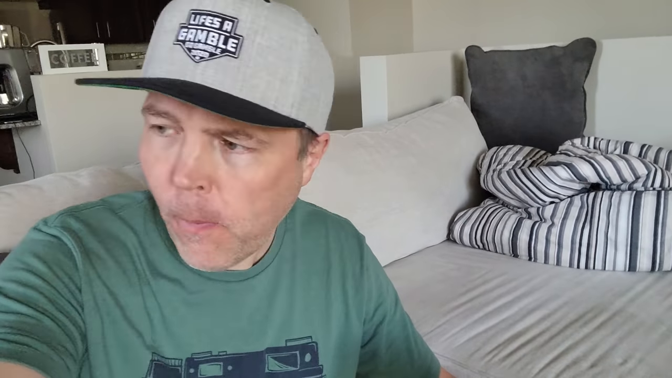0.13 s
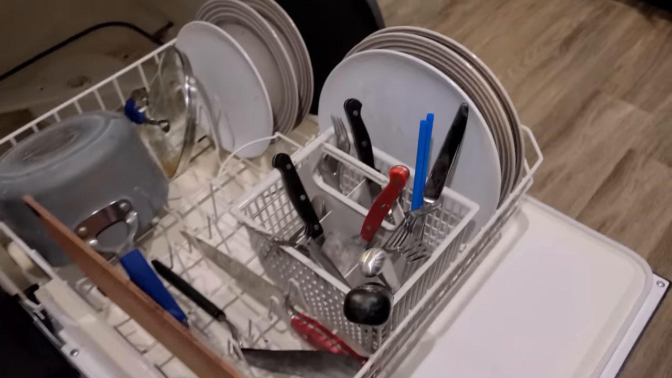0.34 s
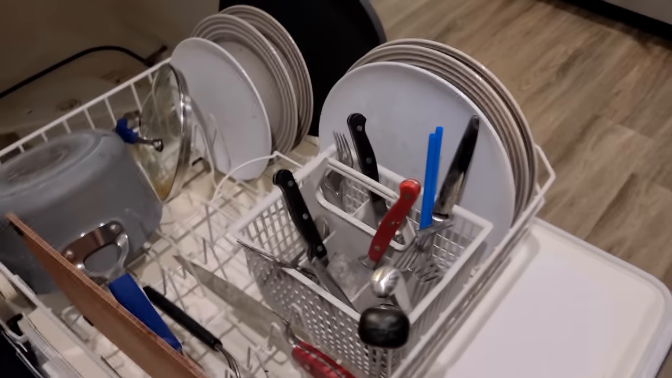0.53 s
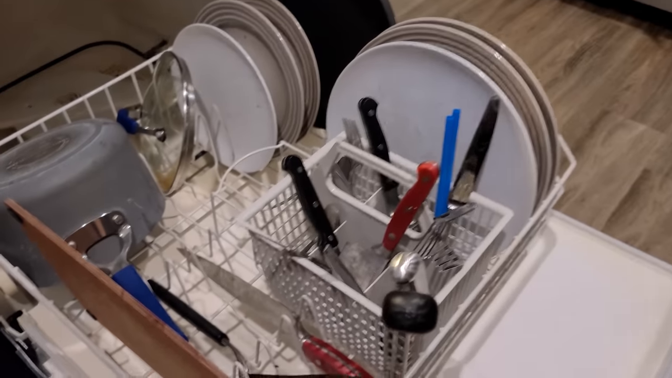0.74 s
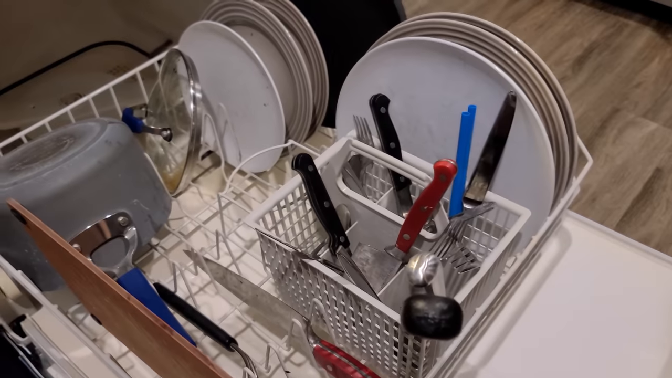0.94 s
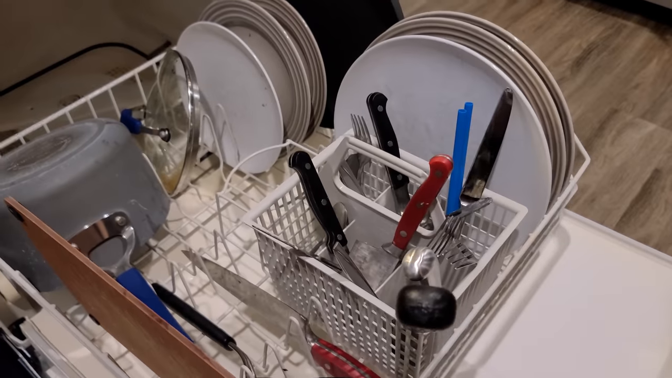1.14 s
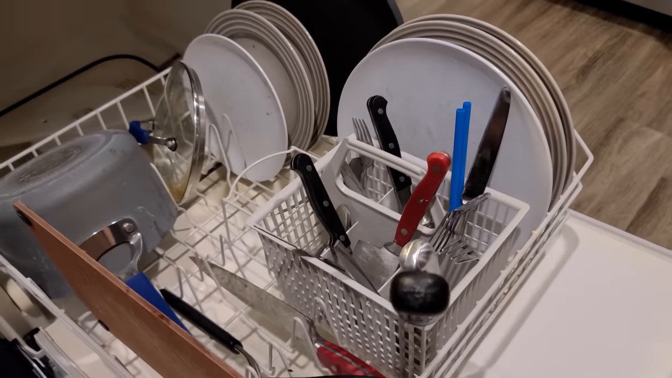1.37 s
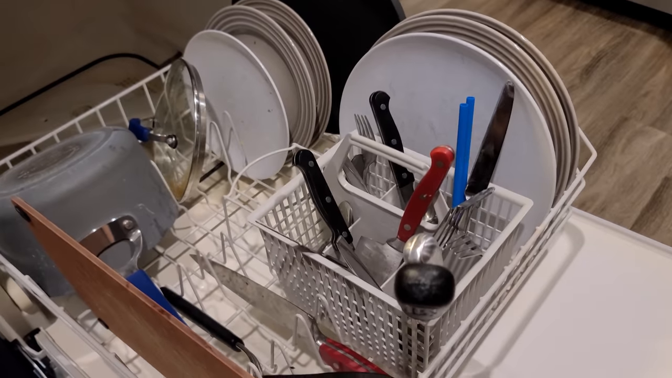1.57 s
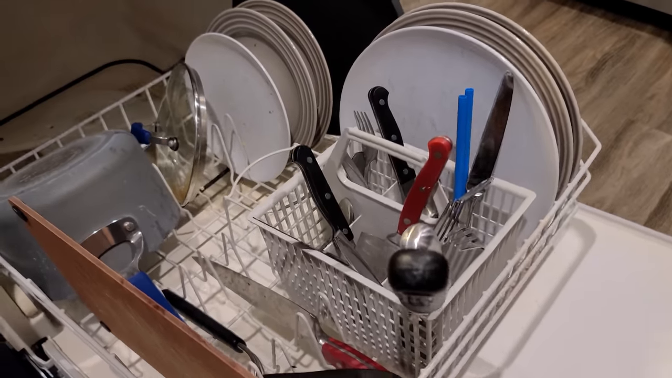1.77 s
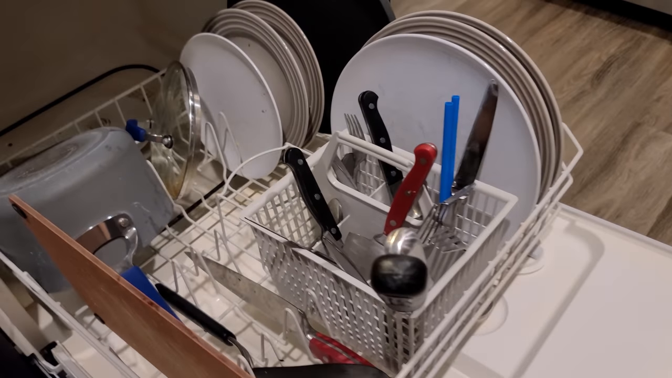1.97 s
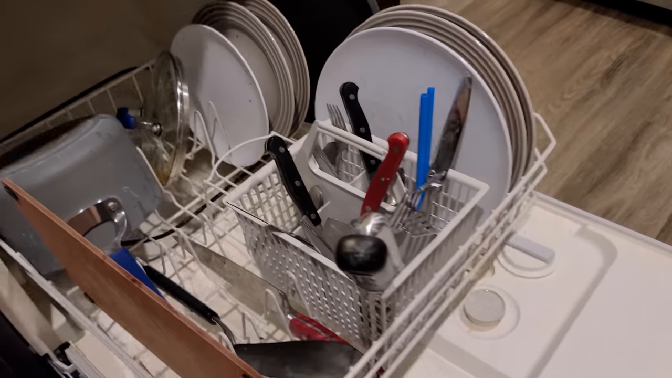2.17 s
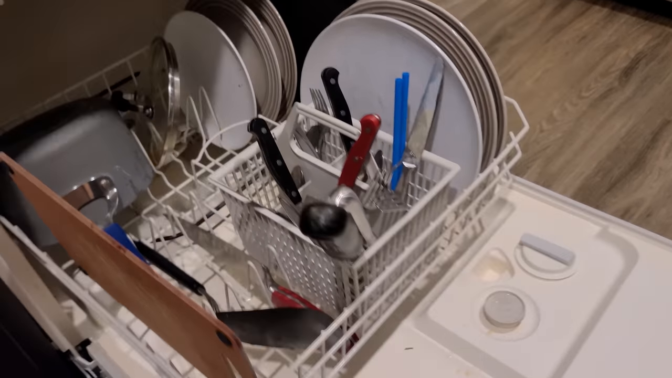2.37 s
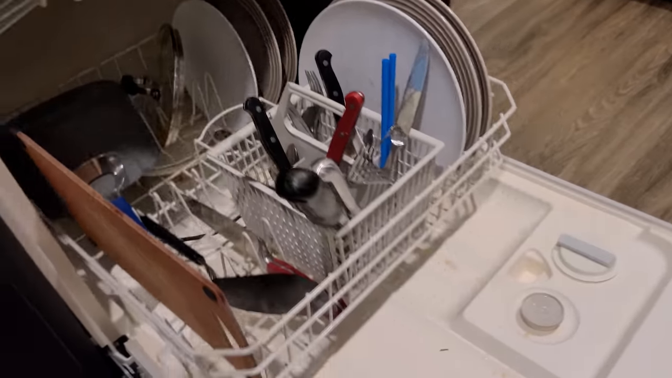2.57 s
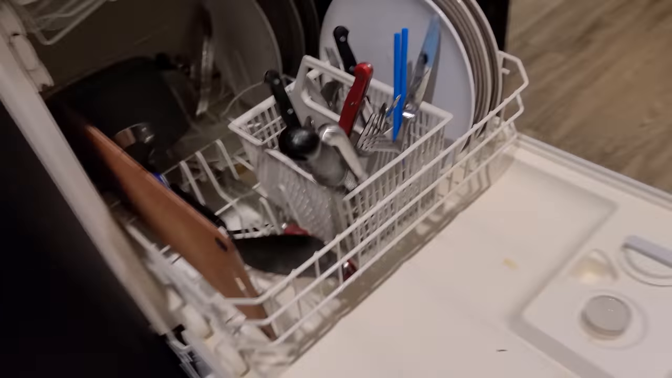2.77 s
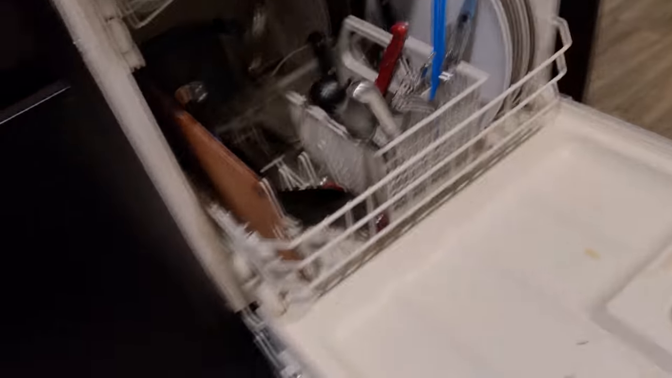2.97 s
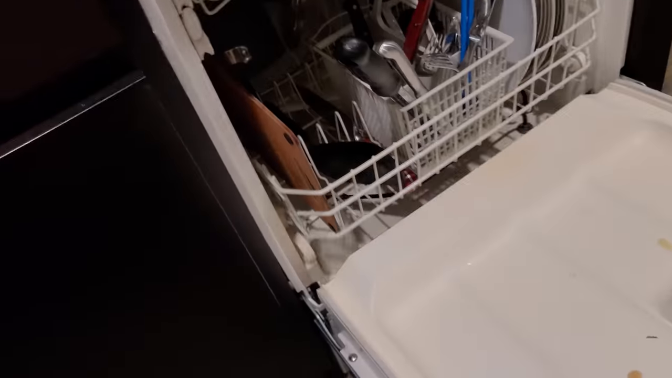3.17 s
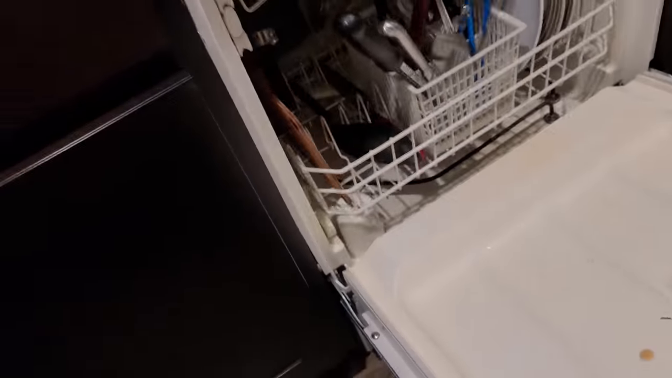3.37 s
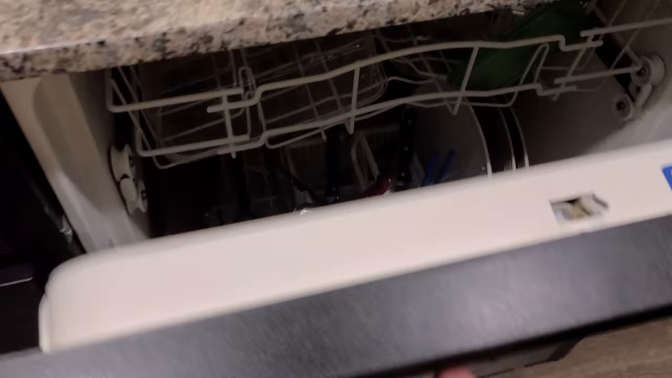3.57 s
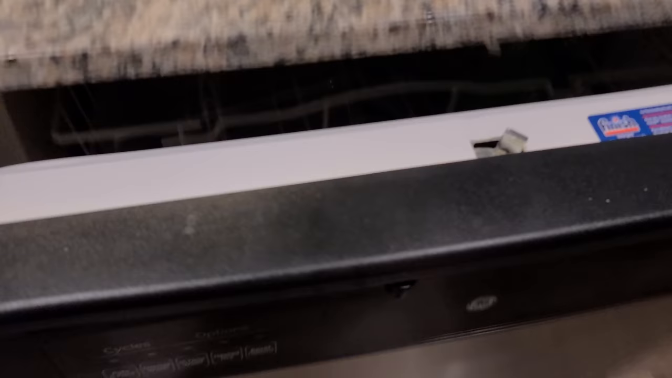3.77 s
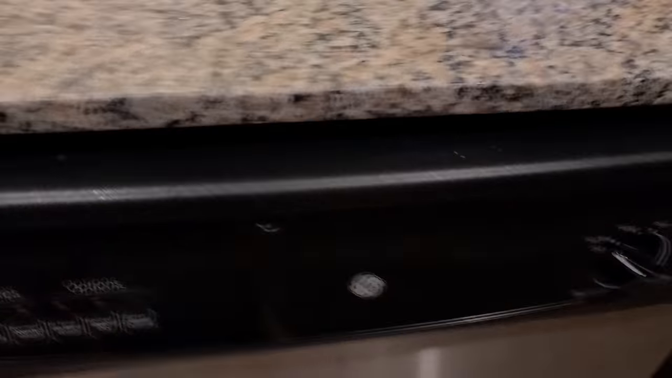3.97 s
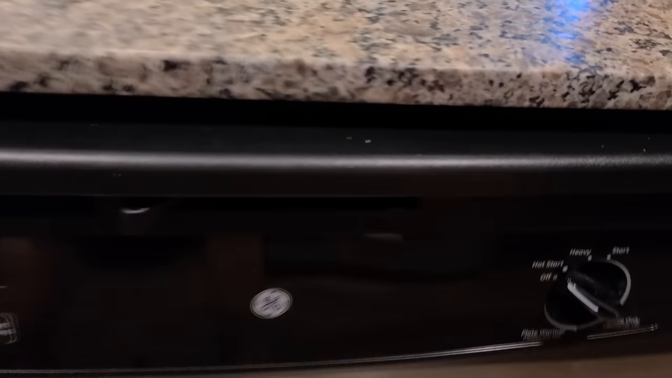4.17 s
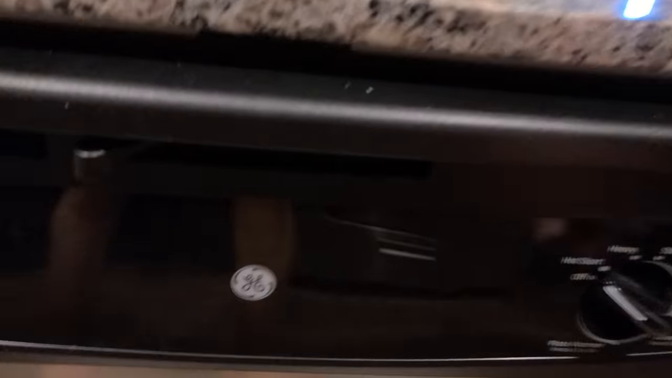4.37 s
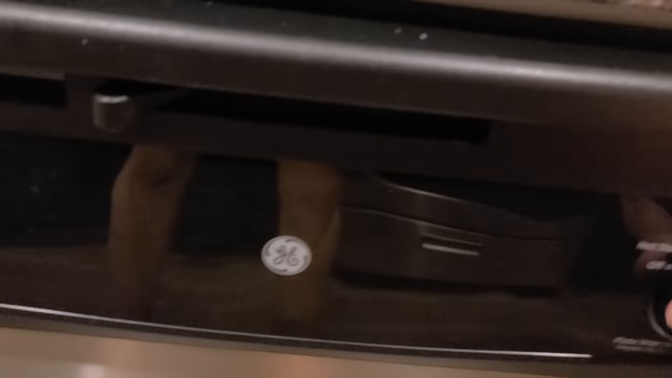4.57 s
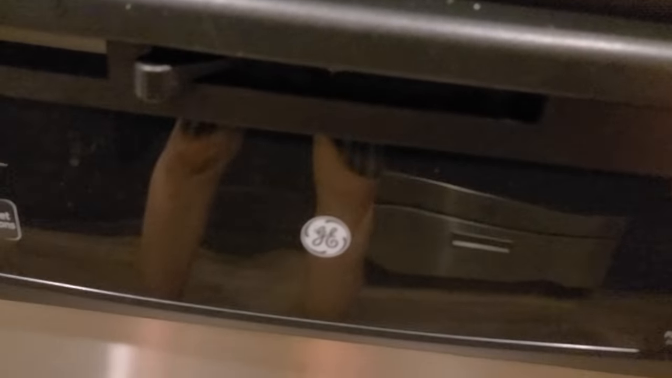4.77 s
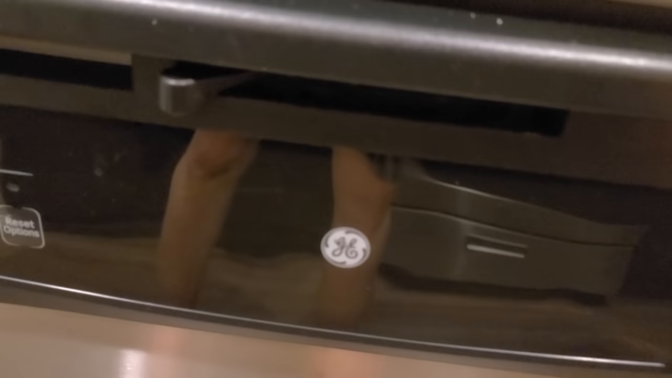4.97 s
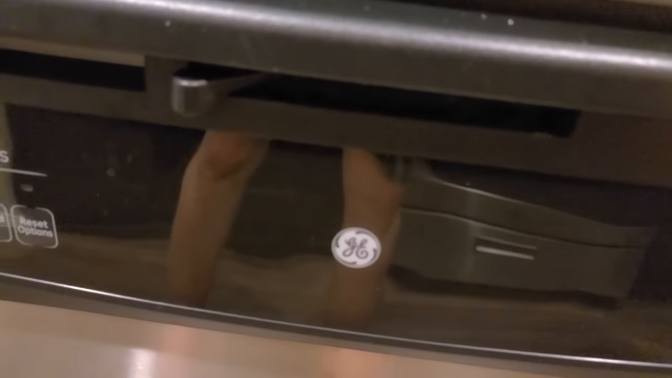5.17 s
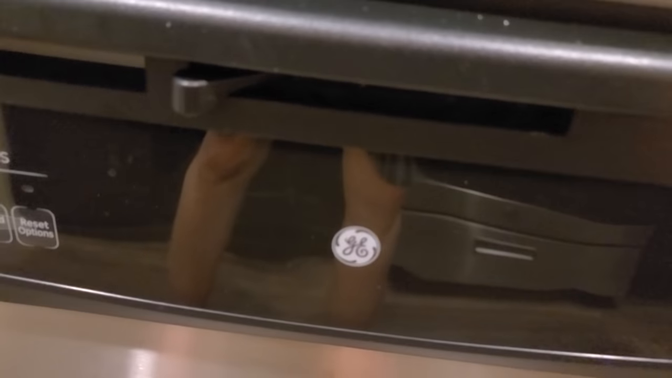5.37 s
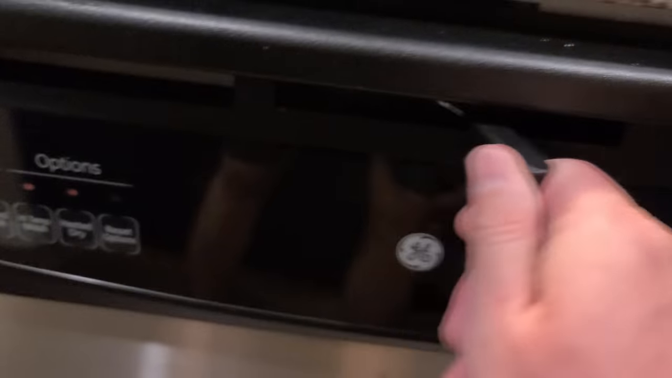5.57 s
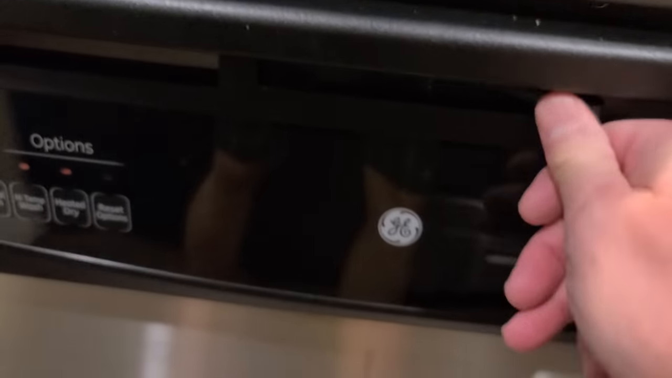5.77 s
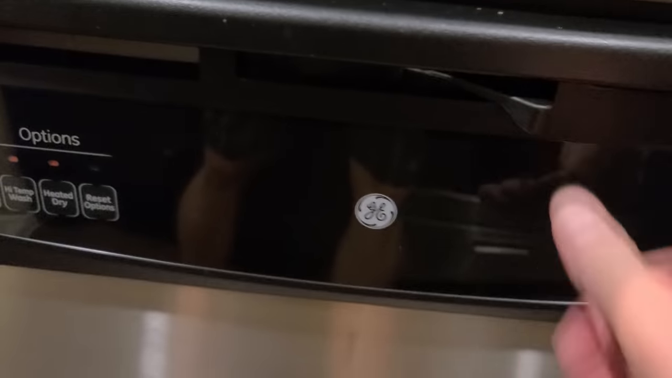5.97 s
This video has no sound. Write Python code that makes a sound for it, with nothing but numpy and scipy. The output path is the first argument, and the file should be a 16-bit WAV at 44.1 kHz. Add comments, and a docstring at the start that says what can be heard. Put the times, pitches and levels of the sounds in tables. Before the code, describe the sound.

Close handheld pickup in a small, hard-walled kitchen, after a moment of near silence elsewhere. Over steady dull air noise, metal utensils tick and clink sparsely; the loaded rack then knocks, rolls and slams into place, its cutlery jingling until an abrupt cut. A hollow door slam comes next, then a quiet pause with little dial detents, another cut, light lever clicks, a hard snap, a scrape and a solid multiple knock.

```python
"""A hushed lounge with a faint hum opens, then a hard cut to a kitchen: a loaded dishwasher rack clinks, rolls in
and hits its stop. A second cut chops its rattle; the door slams, the dial turns and the latch lever is thrown.
Struck things are banks of decaying modes plus a noise crackle, driven by short chatters and by rains of taps.
Shaped noise makes the hush, the air rush, a faint rustle and the room tail; a slow sine makes the throb
under the kitchen, whose phase jumps at every cut, the third one included."""
import sys
import numpy as np
from scipy import signal
from scipy.io import wavfile
from scipy.ndimage import uniform_filter1d

SR = 44100
rng = np.random.default_rng(int(sys.argv[2]) if len(sys.argv) > 2 else 0)


def log_audio(samples):
    """Write samples as a 16-bit WAV file to the path given in sys.argv[1]."""
    # one column per channel
    frames = np.atleast_2d(samples).T
    # limit to full scale, then quantise
    limited = np.clip(frames, -1, 1)
    pcm = np.round(limited * 32767).astype(np.int16)
    wavfile.write(sys.argv[1], SR, pcm)


N = 265129
TIME = np.arange(N) / SR
# Joins between the four stretches: (time [s])
CUT_TIMES = .1765, 3.578, 5.497
# Port likeness of sound from all sides: (frequency [Hz], left-right likeness [-1 to 1])
DIFFUSE_LIKENESS = [(60, 0.86), (180, 1), (550, 0.6), (1650, -0.31), (4970, 0.23), (15000, -0.25)]


def amp(db):
    """Decibels to gain."""
    return 10 ** (np.asarray(db) / 20)


def evened(x):
    """Scaled to rms 1."""
    return x / np.sqrt(np.mean(x ** 2) + 1e-20)


def read(points, hz):
    """Table value on a log-frequency axis."""
    f, value = np.transpose(points)
    return np.interp(np.log(hz + 1), np.log(f + 1), value)


def take(start, end):
    """Gate open only between two times, with 1 ms ramps."""
    return np.clip(np.minimum(TIME - start, end - TIME) * 1000, 0, 1)


def pair_noise(db, same):
    """Noise at two ports from random short-time spectra; db is bins x frames, same is likeness per bin."""
    a, b, c, d = rng.standard_normal((db.shape[1], db.shape[0], 4)).T
    same = np.clip(same, -1, 1)[:, None]
    left = a + 1j * b
    right = same * left + np.sqrt(1 - same ** 2) * (c + 1j * d)
    size = 2 * (db.shape[0] - 1)
    return signal.istft(np.array([left, right]) * amp(db), nperseg=size, noverlap=size * 3 // 4)[1]


# Colour of the lounge hush: (frequency [Hz], relative level [dB])
LOUNGE_COLOUR = [(25, -33), (66, -15), (188, -24), (1100, -34.5), (15700, -65)]
# Steady tones of the lounge: (frequency [Hz], rms level [dB])
LOUNGE_TONES = [(59.2, -66), (893.6, -84.5), (1050, -85)]
LOUNGE_DB = -76  # rms of the hush


def lounge():
    """Faint mains hum and appliance tones, as steady sines, over a low hush of shaped noise."""
    hz = np.fft.rfftfreq(2048, 1 / SR)
    colour = read(LOUNGE_COLOUR, hz)[:, None] * np.ones(N // 512 + 5)
    hush = pair_noise(colour, np.full(len(hz), .95))[:, :N]
    hum = sum(np.sqrt(2) * amp(db) * np.sin(2 * np.pi * (f * TIME + rng.random())) for f, db in LOUNGE_TONES)
    return amp(LOUNGE_DB) * evened(hush) + hum


# Colour of the ventilation rush: (frequency [Hz], relative level [dB])
AIR_COLOUR = [(25, -16.5), (50, -11), (150, -14), (190, -7.5), (268, -17), (330, -15), (500, -18),
              (1030, -42.5), (1500, -40.5), (3500, -57), (7000, -67), (15700, -68)]
# Course of the rush: (time [s], level around 100-600 Hz [dB], lift reached at 1 kHz and above [dB])
AIR_COURSE = [(.18, -47, 10), (0.899, -49, 9), (2.5, -44, 10), (3.57, -49, 9), (3.587, -51, 8),
              (5.49, -48, 13)]


def air():
    """Ventilation rush: turbulence noise whose colour drifts in patches of time and pitch."""
    hz, t = np.fft.rfftfreq(2048, 1 / SR), np.arange(N // 512 + 5) * 512 / SR
    s, level_db, bright_db = np.transpose(AIR_COURSE)
    patches = uniform_filter1d(rng.standard_normal((len(t), len(hz))), 6, 0)
    patches = evened(uniform_filter1d(patches, 12, 1)).T
    upper = np.clip(np.log2(hz / 500 + 1e-9), 0, 1)[:, None]
    db = read(AIR_COLOUR, hz)[:, None] + 2.3 * patches + upper * np.interp(t, s, bright_db)
    rush = pair_noise(db, read(DIFFUSE_LIKENESS, hz))[:, :N]
    body = signal.sosfilt(signal.butter(2, [100, 600], "band", fs=SR, output="sos"), rush[0])
    return rush / np.sqrt(np.mean(body ** 2)) * amp(np.interp(TIME, s, level_db))


THROB_HZ, THROB_DB = 18.6, -42.5  # peak level


def throb():
    """Very low sine throb of the building, given a new random phase at each cut."""
    turn = uniform_filter1d(rng.random(4)[np.searchsorted(CUT_TIMES, TIME)], size=200)
    return amp(THROB_DB) * np.sin(2 * np.pi * (THROB_HZ * TIME + turn))


RISE_DB = 13  # a stroke climbs this far


def stroke(start, rise, hold, fall_db, db):
    """Level in dB of one movement: rise, hold, release."""
    age = TIME - start
    climb = RISE_DB * np.minimum(age / (abs(rise) + 0.0011) - 1, 0)
    release = abs(fall_db) * np.maximum(age - abs(rise) - abs(hold), 0)
    return np.where(age < 0, -200, db + climb - release)


# Colour of the rustle: (frequency [Hz], relative level [dB])
RUSTLE_COLOUR = [(1500, -24), (4600, -9.5), (8800, -2), (11000, -4), (15500, -18.5)]
# Swells of the rustle: (start time [s], rise [s], hold [s], fall [dB/s], rms level at the hold [dB])
RUSTLE_SWELLS = [(.1, 0.12, 0.41, 29, -72), (2.32, 0.029, 0.049, 96.5, -70.5),
                 (2.808, 0.03, .03, 161, -66.5), (4.373, 0.076, 0.023, 167.5, -69.5)]


def rustle():
    """Faint treble noise that swells and fades, perhaps cloth near the microphone."""
    hz = np.fft.rfftfreq(512, 1 / SR)
    colour = read(RUSTLE_COLOUR, hz)[:, None] * np.ones(N // 128 + 5)
    hiss = pair_noise(colour, read(DIFFUSE_LIKENESS, hz))[:, :N]
    return evened(hiss) * sum(amp(stroke(*row)) for row in RUSTLE_SWELLS)


EDGES_HZ = 500, 4000  # between lows, mids and highs


def ring(modes, split=.008):
    """Response of a body to one tap, each mode a close beating pair: lows, mids and highs, evened in peak level."""
    t, parts = np.arange(16384) / SR, np.zeros((3, 16384))
    for f, db, t60 in modes:
        beat = np.cos(np.pi * f * split * t)
        parts[np.searchsorted(EDGES_HZ, f)] += amp(db - 60 * t / t60) * np.sin(2 * np.pi * f * t) * beat
    return parts / np.sqrt(uniform_filter1d(parts ** 2, 256).max(1, keepdims=True) + 1e-12)


def banded(x, thin_hz):
    """Sum of lows, mids and highs through overlapping filters that fall upwards, of gain 1 on noise."""
    # (band [Hz], order, corner of the upward fall [Hz])
    shapes = ([thin_hz / 9, 330], 2, 400), ([thin_hz, 4200], 3, 750), ([3800, 17000], 2, 12000)
    total = 0
    for (band, order, corner), v in zip(shapes, x):
        band_pass = signal.butter(order, band, "band", fs=SR, output="sos")
        sos = np.vstack([band_pass, signal.butter(1, corner, fs=SR, output="sos")])
        total = total + signal.sosfilt(sos, v) / np.linalg.norm(signal.sosfilt(sos, signal.unit_impulse(4096)))
    return total


# Pace of a stroke's release: one row each for lows, mids, highs (multiple of the stroke's fall)
FALL_RATIOS = [
    [1],
    [1.19],
    [1.63],
]


def played(modes, blows, rubs=(), crack_db=0, crack_t60=.04, ring_db=-6, rough_db=2, pan_db=0, shine_db=-9,
           thin_hz=400, spot_db=-6, spot_t60=.07):
    """Chatters of contact (blows) and rains of tiny taps (rubs) ring the modes and raise a dense crackle of
    countless small modes. The struck spot's short ring is heard dry, without the room tail."""
    parts, drive, crack = ring(modes), np.zeros((3, N + 8192)), np.zeros((3, N + 8192))
    parts[2] *= amp(shine_db)  # level of the high modes
    t, spots = np.arange(8192) / SR, np.zeros(N + 8192)
    for s, db, low_db, high_db, ms, *near_hz in blows:
        grit = rng.standard_normal(8192)
        age = t / (abs(ms) / 1000 + 1e-4)
        span = slice(round(s * SR), round(s * SR) + 8192)
        gains = amp([[db + low_db], [db], [db + high_db]])
        for f in near_hz:
            waver = 1 + .7 * evened(uniform_filter1d(grit, size=200))
            level = gains[np.searchsorted(EDGES_HZ, f)] * amp(spot_db - 60 * t / spot_t60)
            spots[span] += level * (1 - np.exp(-age)) * waver * np.sin(2 * np.pi * f * t)
        chatter = grit * (np.exp(-age) - np.exp(-age * 10))
        chatter /= np.linalg.norm(chatter)
        push = age * np.exp(-age / 0.18)  # the mass behind the blow: longer contact favours deeper modes
        drive[:, span] += gains * amp([[0], [ring_db], [ring_db]]) * [push / push.sum(), chatter, chatter]
        # the crackle's bass lasts longer
        lasts = (abs(crack_t60) + 4 * abs(ms) / 1000) * np.array([[2.2], [1.3], [1]])
        crack[:, span] += gains * amp(crack_db - 60 * t / lasts) * (1 - np.exp(-age / 0.085))

    sizes = amp(np.clip(rough_db, 0, 4) * np.minimum(rng.exponential(1, N), 5))
    taps = evened(sizes * (rng.random(N) < 3000 / SR))  # about 3000 taps per second
    for start, rise, hold, fall_db, db, low_db, high_db in rubs:
        level_db = stroke(start, rise, hold, fall_db * np.array(FALL_RATIOS), db)
        gains = amp(level_db + np.array([[low_db], [0], [high_db]]))
        signed_taps = taps * rng.choice([-1, 1], N)
        evening = amp([[0], [0], [shine_db]]) / (np.linalg.norm(parts, axis=1)[:, None] + 1e-6)
        drive[:, :N] += gains * amp(ring_db) * signed_taps * evening
        crack[:, :N] += gains
    crack[1:, :N] *= evened(uniform_filter1d(taps, 60))  # the crackle comes in grains

    both, left, right = rng.standard_normal((3, N))
    apart = np.array([[.1], [.65], [.75]])  # short waves differ more between the ports
    shared = np.sqrt(1 - apart ** 2) * both
    crackle = np.array([banded(crack[:, :N] * (shared + apart * own), thin_hz) for own in (left, right)])
    sound = signal.oaconvolve(drive, parts, axes=1).sum(0)[:N] + crackle
    return np.array([sound, [spots[:N]] * 2]) * amp([[pan_db / 2], [-pan_db / 2]])


# Decay of the hard-walled room: (frequency [Hz], t60 [s])
KITCHEN_DECAY = [(60, 0.21), (1100, 0.38), (5000, 0.26), (15000, 0.2)]


def in_kitchen(sound, wet_db, lag=5):
    """Direct sound reaches the left port lag samples late; hard walls add a frequency-dependent noise tail."""
    hz, t = np.fft.rfftfreq(256, 1 / SR), np.arange(400) * 64 / SR
    tail = pair_noise(-60 * t / read(KITCHEN_DECAY, hz)[:, None], read(DIFFUSE_LIKENESS, hz))
    tail[:, :130] = 0  # nearest wall
    wet = signal.oaconvolve(sound[0].mean(0)[None], tail / np.linalg.norm(tail[0]), axes=1)[:, :N]
    left, right = sound.sum(0)
    late_left = np.interp(np.arange(N) - lag, np.arange(N), left)
    return np.array([late_left, right]) + amp(wet_db) * wet


# In all blow and stroke tables levels drive the sound, before the ring, crackle, spot and room balances.
# Rack modes: (frequency [Hz], relative level [dB], t60 [s])
RACK_MODES = [(48, -3.5, 0.16), (119, 1.5, 0.053), (178.6, 6, 0.055), (353, 27, 0.08), (460, 51, 0.058),
              (3200, -1.5, 0.04), (823, 15.5, 0.026), (1052, 16.5, 0.037), (1660, 13.5, 0.032),
              (2115, 1.5, 0.062)]
# Rack blows: (time [s], mids level [dB], lows over mids [dB], highs over mids [dB], chatter [ms], spot pitch [Hz])
RACK_HITS = [(1.52, -50.5, -20, 5.5, 2, 2200), (1.621, -45, -19, -13, 11, 1820),
             (2.717, -43.5, 5.5, -33, 4.9, 1700), (2.939, -33, -26, -24, 7.3, 1050),
             (2.952, -28.5, -6, -17.5, 2.6, 1784), (2.963, -27.5, -0.5, -15, 10, 3400),
             (3.156, -32, -25, -18, 8.8, 1900), (3.163, -29.5, -24, -26, 7.4, 2700),
             (3.273, -17, 6, -10, 7.8, 1076), (3.31, -25, 8, -25, 1.4, 866),
             (3.478, -30, -23, -8, 17, 1640)]
# The rack rolls in, and its load rattles after the stop: (start time [s], rise [s], hold [s],
# fall of the lows [dB/s], mids level [dB], lows over mids [dB], highs over mids [dB])
RACK_ROLLS = [(1.1, 0.017, 0.0085, 188, -56, 5.5, -6.5), (1.163, 0.0093, 0.021, 246, -51, 11, -17.5),
              (2.673, 0.088, 0.88, 198, -55, 5.5, -41), (3.258, 0.037, 0.13, 60, -35, -5.5, -14.5)]


def rack():
    """Loaded coated-wire rack: modes struck at the stop and shaken by uneven taps."""
    return played(RACK_MODES, RACK_HITS, RACK_ROLLS, crack_db=0.5, crack_t60=0.035, ring_db=-1.5, rough_db=3,
                  pan_db=-0.1, spot_db=7.0)


# Cutlery modes: (frequency [Hz], relative level [dB], t60 [s])
CUTLERY_MODES = [(930, 6, 0.11), (1450, -10, 0.08), (2547, 12, 0.052), (3040, 16, 0.07), (6940, -1.5, 0.13),
                 (7820, 6, 0.14), (10500, 2.5, 0.13), (10970, 9.5, .09), (12100, 7.5, 0.07),
                 (13500, 9, .08)]
# Clinks: (time [s], mids level [dB], highs over mids [dB], spot pitch [Hz])
CUTLERY_CLINKS = [(1.127, -54, -16, 2820), (1.187, -54, -9, 3370), (1.32, -68, -16, 3090),
                  (1.418, -66.5, -22, 3090), (1.615, -56, -16, 3050), (1.813, -48, -9, 1400),
                  (1.928, -57, -6, 3070), (2.11, -55, -13, 3170), (2.273, -59.5, -11, 3100),
                  (2.451, -55, -2, 2490), (3.345, -52, -6.5, 14900), (3.35, -42, -6, 10200),
                  (3.395, -43.5, 8, 11000), (3.398, -45, 5.5, 13500), (3.408, -42, 1, 7890),
                  (3.425, -52, 9, 6800), (3.508, -47, 4, 10200)]
# The basket shakes after the stop: (start time [s], rise [s], hold [s], fall of the lows [dB/s],
# mids level [dB], lows over mids [dB], highs over mids [dB])
BASKET_JINGLE = [ (3.29, 0.098, 0.028, 47, -47, -21, 6.1)]
CLINK_LOW_DB, CLINK_MS = -16, 3.5  # lows over mids; chatter


def cutlery():
    """Bright, long-ringing clinks of metal, and a jingle of many taps."""
    clinks = [(s, db, CLINK_LOW_DB, high_db, CLINK_MS, hz) for s, db, high_db, hz in CUTLERY_CLINKS]
    return played(CUTLERY_MODES, clinks, BASKET_JINGLE, crack_db=-3.0, crack_t60=0.086, ring_db=-4.0, rough_db=4,
                  spot_db=4.5, spot_t60=0.13, shine_db=1.5, pan_db=0.2, thin_hz=1000)


# Floor modes: (frequency [Hz], relative level [dB], t60 [s])
FLOOR_MODES = [(45, 12.5, 0.18), (81.5, 11, 0.065), (120, 8.5, 0.049), (208, -7, 0.06)]
# Thumps: (time [s], lows level [dB], chatter [ms])
FLOOR_THUMPS = [(1.268, -23, 45), (2.033, -22, 55), (3.398, -17.5, 11), (3.42, -20.5, 17),
                (4.141, -16.5, 4.3), (4.681, -30.5, 3.7)]
THUMP_MID_DB, THUMP_HIGH_DB = -26.5, -48.5  # over the lows


def floor():
    """Dull thumps: soft pushes into the low modes of the floor."""
    thumps = [(s, db + THUMP_MID_DB, -THUMP_MID_DB, THUMP_HIGH_DB - THUMP_MID_DB, ms)
              for s, db, ms in FLOOR_THUMPS]
    return played(FLOOR_MODES, thumps, crack_db=-18.0, crack_t60=0.0045)


# Door modes: (frequency [Hz], relative level [dB], t60 [s])
DOOR_MODES = [(40, -10, 0.4), (76.8, 28.5, 1), (119, 45.5, 0.11), (187, 43, 0.13), (272, 21, 0.25),
              (438, 37, 0.071), (608, 10.5, 0.074), (847, 8, 0.058), (1247, 10, 0.04), (1360, 6, 0.043),
              (1550, 14, 0.017), (2045, 7, 0.049), (8760, 0, 0.013)]
# Door blows: (time [s], mids level [dB], lows over mids [dB], highs over mids [dB], chatter [ms], spot pitch [Hz])
DOOR_HITS = [(3.871, -52, 15, -28, 4.3, 784), (4.001, -24.5, -34, 2.5, 8.3, 1140),
             (4.021, -24, 14, -25, 4.5, 838), (4.06, -21.5, 11.5, -8.5, 9, 713),
             (4.098, -21, 4.5, -18, 2.1, 610), (5.879, -22, -16, -8, 2.6, 1498),
             (5.887, -13, -17, -10, 8.5, 1338), (5.903, -19, 1, -13.5, 5.1, 1883),
             (5.916, -23, 5.5, -9, 3.5, 796), (5.935, -23, 2.5, -25, 2.8, 1200)]
# Door rubs: (start time [s], rise [s], hold [s], fall of the lows [dB/s],
# mids level [dB], lows over mids [dB], highs over mids [dB])
DOOR_RUBS = [(3.998, 0.028, 0.094, 110, -33, 8, -11), (5.532, 0.057, 0.2, 100, -45.5, 9, -17),
             (5.86, 0.021, 0.018, 90, -27, -9.5, -20)]


def door():
    """Boomy panel modes hit in clusters, at the slam and again as the lever goes over."""
    return played(DOOR_MODES, DOOR_HITS, DOOR_RUBS, crack_db=-9.0, crack_t60=0.023, ring_db=-7.0, rough_db=0.5,
                  pan_db=1.5, spot_db=8.5)


# Latch modes: (frequency [Hz], relative level [dB], t60 [s])
LATCH_MODES = [(70, -3, 0.095), (262.4, 33.5, 0.13), (442, 27, 0.14), (1675, 0, 0.08), (2140, 12, 0.02),
               (2760, 10, 0.035), (7360, 20, 0.032), (11100, 3, 0.01)]
# Latch blows: (time [s], mids level [dB], lows over mids [dB], highs over mids [dB], spot pitch [Hz])
LATCH_SNAPS = [(4.692, -57.5, -1, -8.5, 1980), (5.527, -33.5, -20, -5, 2770), (5.55, -40.5, -23, -11, 2050),
               (5.604, -44.5, 2, -10, 2870), (5.624, -36.5, 5, 3.5, 1800), (5.645, -37, -24, -2.5, 1190),
               (5.719, -15.5, 1.5, -5, 1135)]
# The lever scrapes on after the snap: (start time [s], rise [s], hold [s], fall of the lows [dB/s],
# mids level [dB], lows over mids [dB], highs over mids [dB])
LEVER_SCRAPE = [(5.72, 0.06, 0.18, 100, -39.5, -4.5, -12)]
LATCH_MS = 1  # chatter


def latch():
    """Lever clicks and a hard snap, mostly crackle, then a scrape."""
    snaps = [(s, db, low_db, high_db, LATCH_MS, hz) for s, db, low_db, high_db, hz in LATCH_SNAPS]
    return played(LATCH_MODES, snaps, LEVER_SCRAPE, spot_db=3.0, crack_db=7.0, crack_t60=0.022, ring_db=-13.0,
                  pan_db=2.5, thin_hz=850)


# Dial modes: (frequency [Hz], relative level [dB], t60 [s])
DIAL_MODES = [(1493, 19.5, 0.055), (1790, 20.5, 0.035), (2290, 27, 0.02), (2900, 24, 0.02),
              (3740, 22, 0.025), (8670, 4, 0.039), (9140, 4, 0.033), (10700, 5.5, 0.034)]
# Detent clicks: (time [s], mids level [dB], spot pitch [Hz])
DIAL_DETENTS = [(4.835, -63.5, 2320), (5.151, -36, 1114), (5.284, -60.5, 3070), (5.342, -35.5, 4070)]
# The dial rubs as it turns: (start time [s], rise [s], hold [s], fall of the lows [dB/s],
# mids level [dB], lows over mids [dB], highs over mids [dB])
DIAL_RUB = [(4.876, 0.059, 0.14, 198, -55.5, -5, -4.5)]
DETENT_LOW_DB, DETENT_HIGH_DB, DETENT_MS = -23, 0, 2.35  # both over mids; chatter


def dial():
    """Dial detents click small, quickly decaying modes, with a brief rub between."""
    detents = [(s, db, DETENT_LOW_DB, DETENT_HIGH_DB, DETENT_MS, hz) for s, db, hz in DIAL_DETENTS]
    return played(DIAL_MODES, detents, DIAL_RUB, crack_db=4.0, crack_t60=0.045, ring_db=1.5, rough_db=1.0,
                  spot_db=12.0, spot_t60=0.037, pan_db=2.0, thin_hz=685)


def scene():
    """Lounge, then kitchen; the rack stretch is cut off mid-rattle, tail and all."""
    early = take(0, CUT_TIMES[1])
    thumps = floor()
    loading = in_kitchen(rack() + cutlery() + thumps * early, wet_db=-1.5) * early
    closing = in_kitchen(door() + latch() + dial() + thumps * (1 - early), wet_db=-4.5)
    background = (air() + throb() + rustle()) * take(CUT_TIMES[0], 7)
    return lounge() * take(-1, CUT_TIMES[0]) + background + loading + closing


EDGE_HZ = 15900  # top of the recorded band


def record(dry):
    """The input stage rounds off the loudest peaks; then the band limit."""
    dry = np.tanh(dry / .95) * .95
    return signal.oaconvolve(dry, signal.firwin(511, EDGE_HZ, window=("kaiser", 9), fs=SR)[None], "same")


dry = scene()
out = record(dry)
log_audio(out)
```